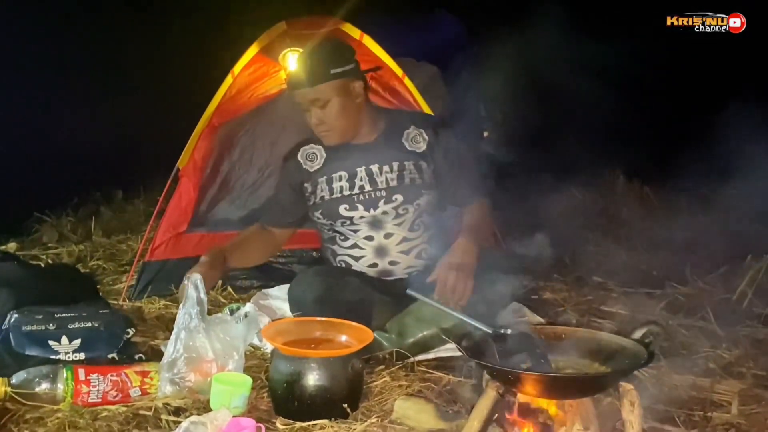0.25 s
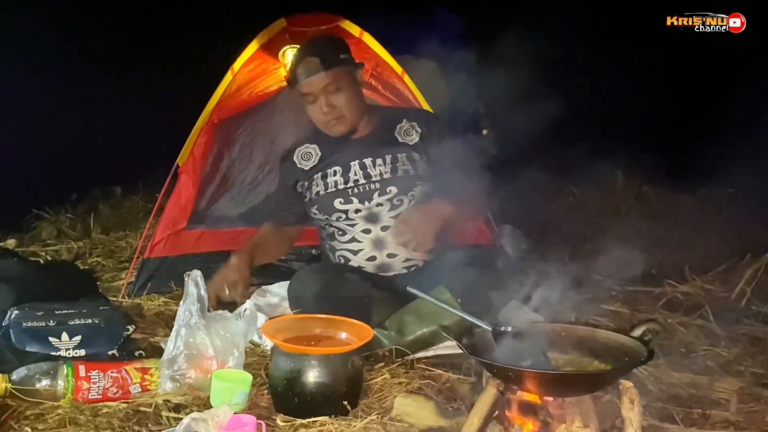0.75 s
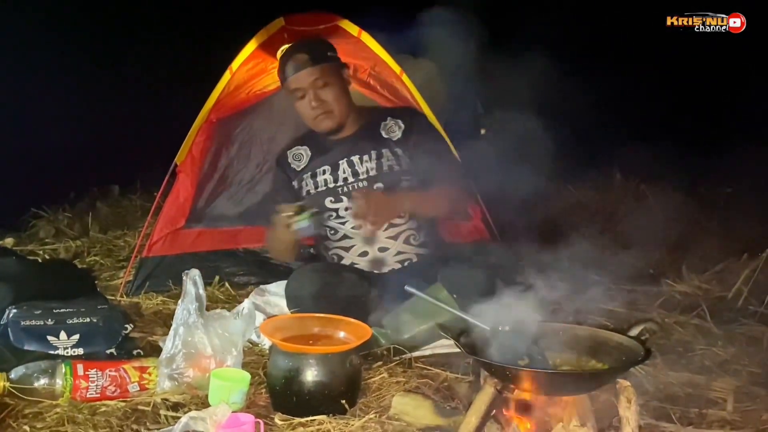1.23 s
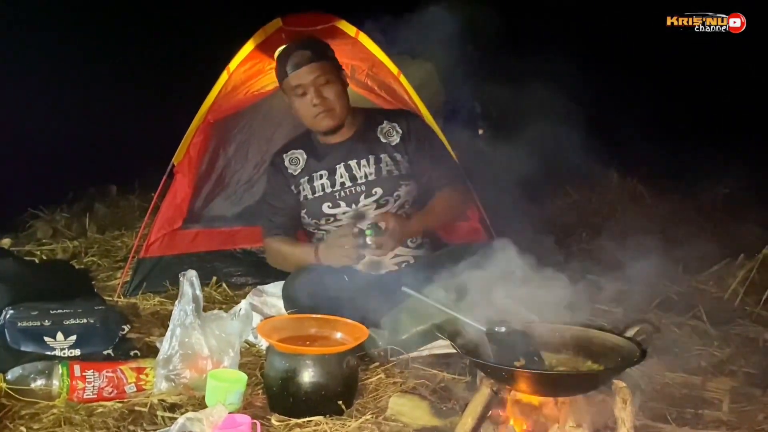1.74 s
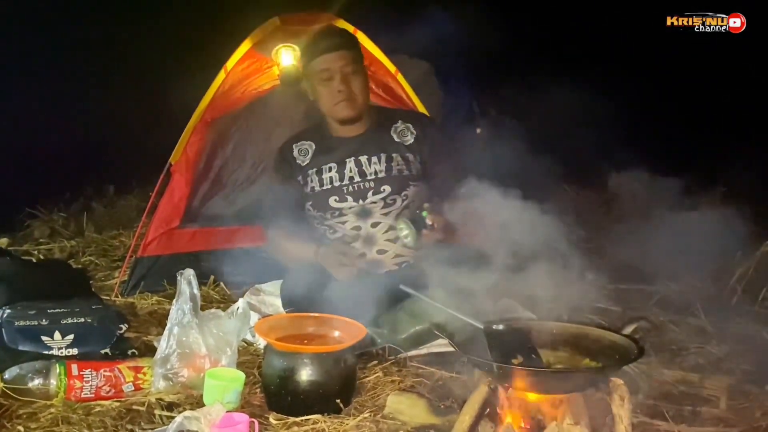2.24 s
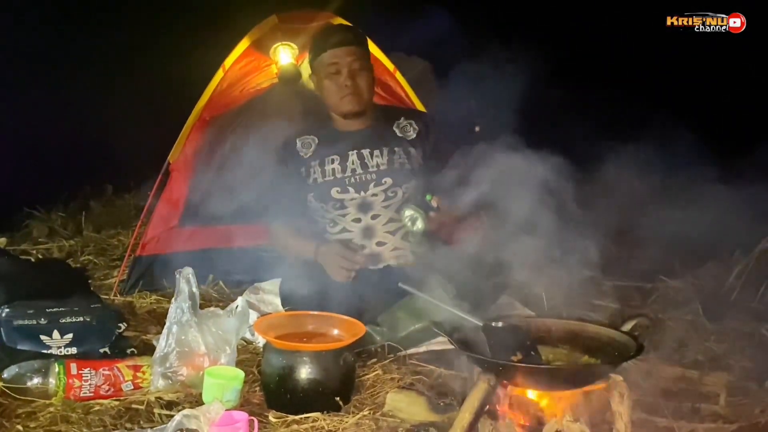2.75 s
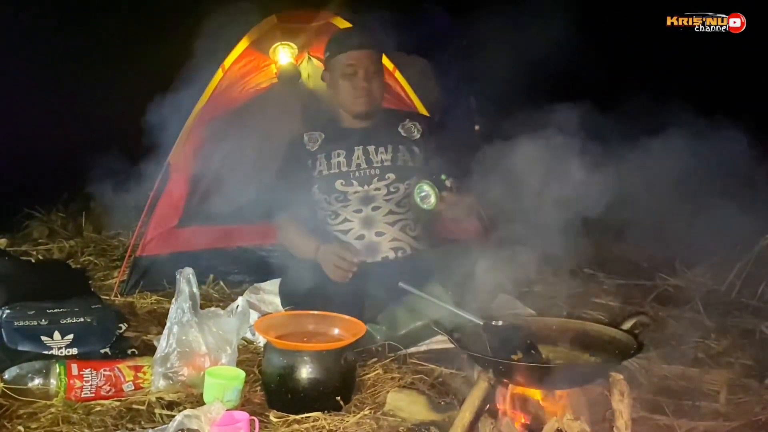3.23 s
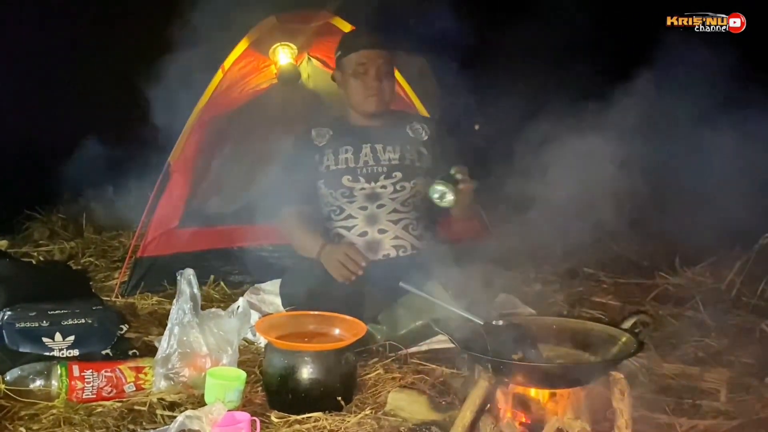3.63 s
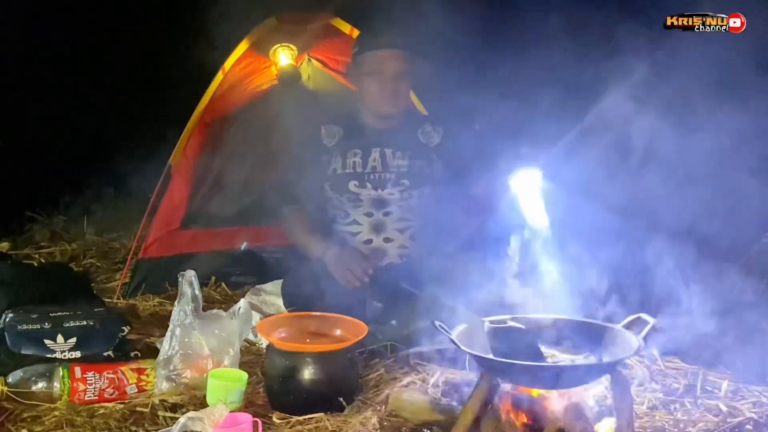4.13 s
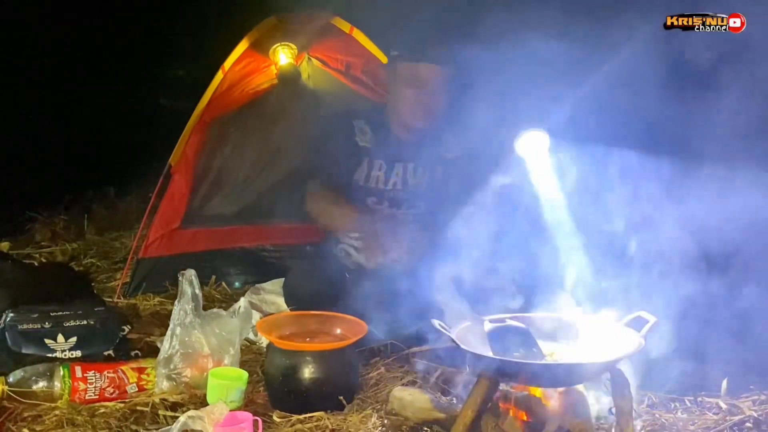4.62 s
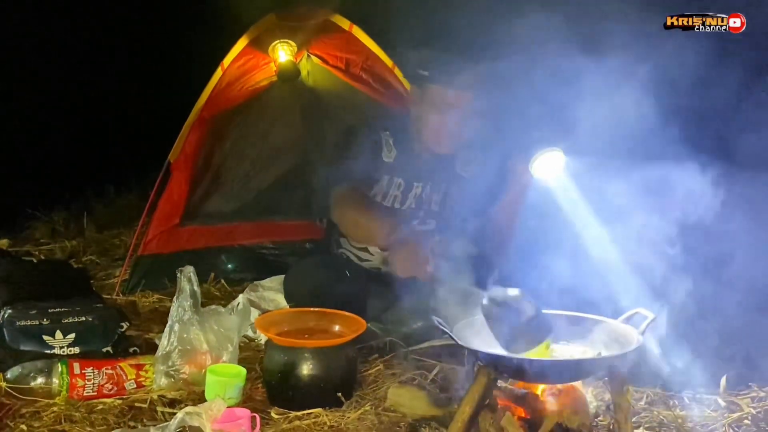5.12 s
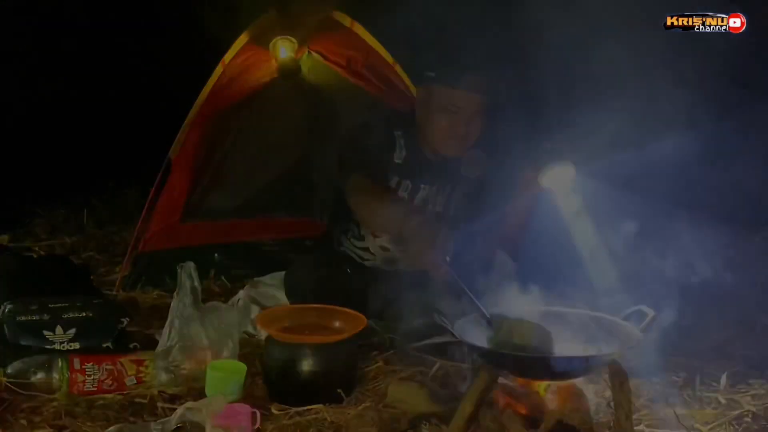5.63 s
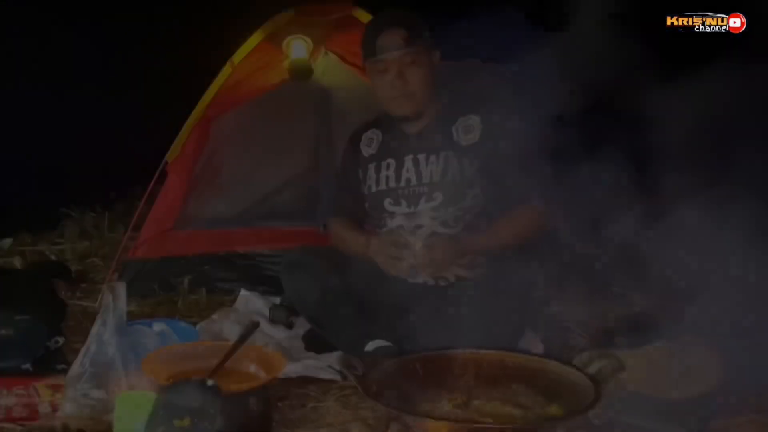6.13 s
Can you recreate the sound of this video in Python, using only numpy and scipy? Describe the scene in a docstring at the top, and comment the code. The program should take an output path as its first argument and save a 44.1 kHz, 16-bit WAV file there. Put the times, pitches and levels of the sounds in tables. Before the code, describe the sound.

A night field heard in stereo, close to a wood fire with no room echo. Throughout, mole crickets make an even buzz around 2.3 kHz, crickets trill in a shimmering band near 7 kHz, and a nearer one repeats chirping phrases about once a second. Beneath them flames flutter softly and a wok simmers with a fine, quiet sizzle. Small dull pops come irregularly, with a low thump near 1.6 s. At 2.4 s the wood bursts: a gritty, very loud crack and deep puff of air, a smaller spurt following at 2.65. Sharp snaps hit at 3.5, 3.9 and 4.2 s. At 5.07 a utensil lightly touches the wok and food rustles; at 5.5 it strikes loudly, ringing briefly and scraping for about 0.2 s, amid snaps and flame thumps. From 5.8 s low buzzing softens, another faint buzz joins, and high crickets brighten until about 6.4 s.

```python
"""Wood fire and wok at night

A wood fire burns under a simmering wok in a field: flames are fluttering low noise and short low thumps,
the crackle is short bursts of filtered noise, and once the wood bursts, with a big low puff of air.
A metal utensil touches the wok, then strikes and scrapes it, ringing a bank of fading tones.
All around, mole crickets buzz low and crickets trill and chirp high, each wing stroke a falling tone.
Near the end one more low buzz fades in, the other low ones get softer and the high ones louder."""
import sys
import numpy as np
from scipy import signal
from scipy.fft import rfft, irfft
from scipy.io import wavfile
from scipy.ndimage import uniform_filter1d

SR = 44100
rng = np.random.default_rng(int(sys.argv[2]) if len(sys.argv) > 2 else 0)


def wav_out(sig):
    """Save sig, one row per channel (or a flat mono array), as 16-bit PCM at SR to the path in sys.argv[1]."""
    wavfile.write(sys.argv[1], SR, np.round(np.clip(np.atleast_2d(sig).T, -1, 1) * 32767).astype(np.int16))


N = 280917
T = np.arange(N) / SR  # time of every sample in seconds
LEFT_LAG_S = .000272  # some sounds reach the left microphone this much later
# near the end the balance of the insect sounds shifts: start and length in seconds
SHIFT_S, SHIFT_RISE_S = 5.83, 0.26


def amp(db):
    """Turn decibels into a gain."""
    return 10 ** (np.asarray(db) / 20)


def level(x, db):
    """Scale a sound to an average (rms) level."""
    return x * amp(db) / np.sqrt(np.mean(x ** 2))


def peak(x, db):
    """Scale a sound so that its largest sample has this level."""
    return x * amp(db) / np.abs(x).max()


def fade(t, t60):
    """Exponential decay that falls 60 dB in t60 seconds."""
    return np.exp(-np.log(1000) * t / t60)


def ramp(start_s, rise_s):
    """Rise from 0 to 1 in a straight line, then hold."""
    return np.clip((T - start_s) / rise_s, 0, 1)


def walk(rate):
    """Slow random wandering with an rms of 1; rate is in new values per second."""
    k = int(SR / rate)
    steps = np.repeat(rng.standard_normal(N // k + 1), k)
    smooth = uniform_filter1d(uniform_filter1d(steps, k), k)
    return level(smooth[:N], 0)


def clicks(rate, spread_db):
    """Random clicks, mostly small and a few large; rate is per second."""
    happens = rng.random(N) < rate / SR
    size = amp(spread_db * np.minimum(rng.exponential(size=N), 4))
    return happens * rng.choice([-1, 1], N) * size


def colour(x, spectrum):
    """Filter a sound to a (Hz, dB) spectrum without any sound ahead of time, by way of its cepstrum."""
    size = 8192
    hz, db = np.transpose(spectrum)
    bins_hz = np.arange(size // 2 + 1) * SR / size
    curve_db = np.interp(np.log(bins_hz + 1), np.log(hz), db)
    cepstrum = irfft(np.log(amp(curve_db)))
    # folding the cepstrum onto its first half makes the filter react only after its input
    cepstrum[1:size // 2] *= 2
    cepstrum[size // 2 + 1:] = 0
    response = irfft(np.exp(rfft(cepstrum)))
    return np.apply_along_axis(signal.fftconvolve, -1, x, response)[..., :x.shape[-1]]


def resonate(x, hz, q):
    """Bring out one broad resonance."""
    hz = min(hz, SR / 3)
    return signal.lfilter(*signal.iirpeak(hz, max(q, .7), fs=SR), x)


def dull(x, hz):
    """Gently soften everything above a frequency."""
    return signal.sosfilt(signal.butter(2, min(hz, SR / 2.2), fs=SR, output="sos"), x)


def place(x, pan_db, lag_s=0):
    """Make mono stereo: pan_db is left minus right, and a positive lag delays the left side."""
    n = np.arange(len(x))
    left = np.interp(n - round(lag_s * SR), n, x, left=0)
    return np.array([left * amp(pan_db / 2), x * amp(-pan_db / 2)])


def scatter(x, wet_db, t60=0.038):
    """Grass and ground send each microphone its own short smear."""
    t = T[:SR // 5]
    tail = rng.standard_normal((2, len(t))) * fade(t, t60)
    tail /= np.sqrt(np.sum(tail ** 2, axis=1, keepdims=True))
    return x + amp(wet_db) * signal.fftconvolve(x, tail, axes=1)[:, :N]


def add(out, s, x):
    """Mix a sound in, starting at s seconds."""
    i = int(s * SR)
    out[..., i:i + x.shape[-1]] += x[..., :N - i]


def wash(spectrum, db, pan_db, flicker_db, shared_db):
    """Countless far insects merge into noise; only a part of it is alike at both microphones."""
    shared = place(amp(shared_db) * rng.standard_normal(N), 0, LEFT_LAG_S)
    crowd = rng.standard_normal((2, N)) + shared
    flicker = place(amp(flicker_db * walk(24.88)), pan_db)
    return level(colour(crowd, spectrum) * flicker, db)


def wings(rate_hz, tone_hz, fall_hz, slip, waver):
    """Each wing stroke is a swelling tone that falls in pitch; slip loosens its phase from stroke to stroke."""
    beats = rng.random() + np.cumsum(rate_hz * (1 + waver * walk(6))) / SR
    u = beats % 1  # how far through the stroke, from 0 to 1
    looseness = slip * rng.standard_normal(N)[beats.astype(int)]
    cycles = (tone_hz * u + fall_hz * u * (1 - u) / 2) / rate_hz + looseness
    return level(np.sin(np.pi * u) * np.sin(2 * np.pi * cycles), 0)


def mole_crickets():
    """Wing strokes fast enough to fuse into buzzes: two even, some looser, and one heard only near the end."""
    # The merged far low insects. Each row: frequency in Hz, relative level in dB.
    low_wash = [(1400, -39), (1780, -17), (1900, -10), (2030, -7), (2240, -7), (2440, 2.5), (2520, -13),
                (2680, -38), (2900, -28), (3600, -40.5)]
    even = place(wings(rate_hz=136.2, tone_hz=2328.3, fall_hz=480, slip=0.12, waver=0.003034), 6.1)
    lower = place(wings(rate_hz=136.2, tone_hz=1917, fall_hz=148, slip=0.066, waver=0.00195), 2.7)
    loose = 0
    for hz in np.linspace(110, 140, 3):
        neighbour = wings(hz, tone_hz=2287.6, fall_hz=307, slip=0.27, waver=.03)
        loose = loose + scatter(place(neighbour, 4.3), -1.7)
    another = place(wings(rate_hz=122.3, tone_hz=2304, fall_hz=238, slip=0.1, waver=0.00285), 5) * amp(-29.5)
    chorus = level(even, -34.0) + level(lower, -51.0) + level(loose, -38)
    chorus = chorus + wash(low_wash, -36.5, 3.2, 0.7, -12)
    shift = ramp(SHIFT_S, SHIFT_RISE_S)
    return chorus * amp(-4 * shift) + another * shift


def trillers():
    """High crickets whose fast strokes swell several times a second, over thin far trills."""
    # The merged far high insects. Each row: frequency in Hz, relative level in dB.
    high_wash = [(3600, -36.5), (4400, -24), (4750, -12.5), (5100, -5.5), (5400, -4.5), (5800, -8),
                 (6150, -17.5), (6500, -5.5), (6880, 0.5), (7300, -2.5), (7750, -16), (8350, -7.5),
                 (9000, -54), (9700, -24.5)]
    # Thin steady trills far away. Each row: frequency in Hz, middle gain in dB.
    thin_trills = [(5113, -45.5), (5350, -50), (5453, -50)]
    near = 0
    for hz, db in [(83.0, -2.5), (88.8, 2.5), (45.24, -1.5)]:  # (strokes per s, relative dB)
        swells = 6.5 * T + rng.random() + 0.48 * walk(1.86)
        throb = amp(db + 4.4 * np.sin(2 * np.pi * swells))
        trill = wings(hz, tone_hz=6885, fall_hz=563, slip=0.46, waver=.008) * throb
        near = near + scatter(place(trill, 0.42), -12)
    thin = np.zeros((2, N))
    for hz, db in thin_trills:
        for side in range(2):  # each microphone gets its own wandering
            strength = amp(db + 2 * walk(11))
            thin[side] += strength * np.sin(2 * np.pi * (hz * T + 0.13 * walk(10)))
    chorus = level(near, -33.5) + wash(high_wash, -31.0, 0.86, 1, 0)
    return chorus * amp(1.6 * ramp(SHIFT_S, SHIFT_RISE_S)) + thin


def near_strokes(step_s=.056, double_gap_s=.035):
    """Middle times of the near cricket's strokes: each phrase is an even run, then double strokes."""
    # Each row: start in seconds, number of even strokes, number of double strokes, seconds between doubles.
    phrases = [(.075, 0, 2, .111), (.305, 5, 5, .114), (1.212, 5, 5, .111), (2.06, 4, 6, .113),
               (3.0, 6, 6, .122), (4.06, 4, 6, .117), (4.995, 4, 10, .1175)]
    times = []
    for s, even, doubles, period in phrases:
        run = s + step_s * np.arange(even)
        firsts = s + step_s * even + period * np.arange(doubles)
        times += [*run, *firsts, *(firsts + double_gap_s)]
    return times


def chirpers(length_s=.037, tone_hz=5720, fall_hz=580):
    """A near cricket draws slow, rasping, falling strokes; others sing a little lower and grow louder."""
    t = T[:int(length_s * SR)]
    u, near = t / length_s, np.zeros(N)
    for s in near_strokes():
        pitch, size_db = rng.standard_normal(2)
        hz = tone_hz * (1 + .005 * pitch) + fall_hz * (.5 - u)
        stroke = np.sin(np.pi * u) * np.sin(2 * np.pi * np.cumsum(hz) / SR)
        add(near, s - length_s / 2, amp(size_db) * stroke)
    rasp = amp(2 * walk(300))
    near = level(scatter(place(near * rasp, 0), -8), -44.5)
    others = 0
    for hz in np.linspace(35, 70, 4):
        singer = wings(hz, tone_hz=5336, fall_hz=480, slip=0.58, waver=0.016)
        others = others + scatter(place(singer, 1, LEFT_LAG_S), 12.0)
    gain_db = 1.56 * T + 8 * ramp(SHIFT_S, SHIFT_RISE_S)  # a slow rise, then a quick one near the end
    return near + level(others, -51.5) * amp(gain_db)


def simmering_wok():
    """The food simmers in small soft bursts of noise under a fine steady sizzle."""
    # The two spectra. Each row: frequency in Hz, relative level in dB.
    simmer_colour = [(200, -6), (380, -3), (600, -12), (800, -18), (1130, -3.5), (1400, -10.5),
                     (1800, -6.5), (3000, -10.5)]
    sizzle_colour = [(300, 8), (1200, 10.5), (3000, 15), (4200, 9), (8000, 1), (11500, 7.5), (15500, -29)]
    bursts = signal.fftconvolve(np.abs(clicks(60, 3.5)), fade(T[:SR // 10], 0.11))[:N]
    soft_bursts = uniform_filter1d(bursts, size=200)
    simmer = dull(colour(soft_bursts * rng.standard_normal(N), simmer_colour), 3070)
    spatter = level(clicks(1500, 1.8), -7.5)
    sizzle = colour(rng.standard_normal(N) + spatter, sizzle_colour) * amp(0.47 * walk(3.6))
    simmer = scatter(place(simmer, -.5), -7)
    sizzle = scatter(place(sizzle, .5, LEFT_LAG_S), -8)
    return level(simmer, -45.5) + level(sizzle, -46.0)


def pressure(attack_s=0.0017, start_s=5.494, hold_s=0.17, release_t60=.09):
    """Force of the utensil on the wok: it bites in, slides on and lifts off."""
    slide_db, bite_db, bite_s = -26, 8.5, 0.012
    bite = np.exp(-np.maximum(T - start_s, 0) / bite_s)
    release = fade(np.maximum(T - start_s - hold_s, 0), release_t60)
    return ramp(start_s, attack_s) * release * amp(slide_db + bite_db * bite)


def utensil(wander_db=5, ring_db=9, grit_db=3):
    """Blows and stick-slip scraping ring the same tones of the metal; the rough contact adds grit."""
    # Ringing tones of wok and utensil. Each row: pitch in Hz, relative level in dB, 60 dB decay in seconds.
    wok_tones = [(657, -14, .1), (980, -16, .15), (1091, -13, .45), (1505, 1, .22), (1627, -1, .13),
                 (1665, -1, .1), (1791, 3, .2), (1880, -7, .08), (2260, -7, .07), (2400, -7, .07),
                 (2509, -7, .15), (2627, -9, .09), (2762, -7, .2), (3248, -5, .2), (3512, 0, .16),
                 (3561, 1, .14), (3590, 1, .1), (3762, -2, .15), (4005, -4, .18), (4377, -6, .07),
                 (4624, -3, .07), (4782, -4, .09), (4853, -4, .09), (4920, -4, .08)]
    # Blows. Each row: start in seconds, peak in dB, top edge in Hz (lower for a softer touch).
    blows = [(5.073, -39, 705), (5.4936, -2.5, 9000), (5.499, -25, 4000)]
    # Spectrum of the rough contact. Each row: frequency in Hz, relative level in dB.
    grit_colour = [(200, 3), (450, -10), (650, -14), (820, -33), (1300, -16), (1600, 14.5), (1950, -8),
                   (2450, 5), (3000, 0), (3600, 2.5), (4200, 4.5), (4850, 1.5), (5600, -4.5), (8000, -16),
                   (11000, -3), (16000, -26)]
    t = T[:SR // 2]
    slips = level(clicks(1500, 2.7), 0) * pressure() * amp(2 * walk(90))
    out = scatter(place(colour(slips, grit_colour), 1.3), 0, t60=0.035) * amp(grit_db)
    ring = 0
    for hz, db, t60 in wok_tones:
        phase = hz / 9000 * rng.standard_normal((2, 1))  # differs between the microphones
        mode = amp(db) * fade(t, t60) * np.sin(2 * np.pi * hz * t + phase)
        # the sliding contact damps each tone and grips it more or less
        held = mode * fade(t, .5)
        grip = slips * amp(ring_db + wander_db * walk(30))
        out += signal.oaconvolve(grip[None], held, axes=1)[:, :N] / np.sqrt(len(t))
        ring = ring + mode
    for s, db, top_hz in blows:
        contact = colour(rng.standard_normal(len(t)) * fade(t, 0.05), grit_colour)
        blow = peak(ring, 0) + peak(contact, -9)
        add(out, s, peak(dull(blow, top_hz), db))
    return out


def thump(db, first_hz, length_s, crest, end_hz=43.6, bend=0.69, rumble_db=-7.0, sharpness=1.55):
    """A short low thump: a swelling tone whose heard pitch bends downward, plus low noise mostly early on."""
    u = T[:int(length_s * SR)] / length_s
    # crest is the share of the length at which the thump is loudest
    swell = np.sin(np.pi * np.interp(u, [0, min(crest, .9), 1], [0, .5, 1]))
    hz = first_hz * (end_hz / first_hz) ** u ** bend  # bend under 1: the pitch falls early
    tone = np.sin(2 * np.pi * np.cumsum(hz) / SR)
    rumble = level(dull(rng.standard_normal(len(u)), 1.05 * first_hz), rumble_db) * (1 - u)
    return peak(swell ** sharpness * tone + swell * rumble, db)


def flames(step_s=0.00078):
    """Turbulent flames flutter low, with low thumps and one big puff of air out of step left and right."""
    # Body of the flames, joined by straight lines. Each row: time in seconds, gain in dB.
    flame_gains = [(0.0, -48), (0.44, -41), (0.65, -43.5), (3.55, -37.5), (4.13, -42.5), (5.55, -33),
                   (6.37, -44.5)]
    # Spectrum of the flutter. Each row: frequency in Hz, relative level in dB.
    flame_colour = [(20, -43), (32, -39), (50, -4), (75, -2), (107, 2), (150, -1), (230, -13.5),
                    (400, -28.5), (600, -34.5), (1100, -34), (2000, -66)]
    # Low flame puffs, heard as thumps.
    # Each row: start in seconds, peak in dB before panning, starting pitch in Hz.
    flame_puffs = [(1.559, -16.5, 358), (1.769, -23.5, 192), (4.551, -23, 260), (5.221, -20, 221),
                   (5.453, -26, 180), (5.553, -30, 218), (5.69, -22.5, 161), (5.867, -22.5, 168)]
    flutter = colour(rng.standard_normal(N) * amp(3.24 * walk(21.97)), flame_colour)
    body = level(flutter, 3.3) * amp(np.interp(T, *np.transpose(flame_gains)))
    out = scatter(place(body, 0.95), -10)
    for s, db, hz in flame_puffs:
        add(out, s, place(thump(db, hz, length_s=.046, crest=0.29), 1.0, -step_s))
    # a big low puff of air buffets the microphones: longer, and loudest late
    buffet = thump(-2.5, 402, length_s=0.0525, crest=0.61)
    add(out, 2.423, place(buffet, 2.3, -step_s))
    return out


def faint_pops(per_s=3.5, middle_db=-35, spread_db=2, middle_hz=1150, spread_octaves=.3, pan_db=1.0):
    """Small pops at random times, as rows of seconds, peak dB, pitch in Hz and left minus right dB."""
    count = int(per_s * N / SR)
    chance = rng.standard_normal((count, 3))
    rows = []
    for s, (size, pitch, side) in zip(rng.random(count) * N / SR, chance):
        hz = middle_hz * 2 ** (spread_octaves * pitch)
        rows.append((s, middle_db + spread_db * size, hz, pan_db * side))
    return rows


def crackle(pop_t60=0.058, pop_q=3.2, overtone=1.76, overtone_db=-6):
    """Filtered noise bursts: dull ringing pops, dry snaps and longer gritty spurts, a few from the wok."""
    # All peaks are before the final smear, those of the pops before panning too.
    # Louder dull pops; the one at 5.072 belongs to the utensil touching the wok.
    # Each row: start in seconds, peak in dB, pitch in Hz, left minus right in dB.
    loud_pops = [(0.101, -21.5, 950, -2), (0.372, -28.5, 1160, -1), (0.704, -29, 1090, -1),
                 (0.866, -28, 1180, -5), (1.042, -28, 724, -3), (1.178, -31, 1710, 0),
                 (1.317, -25, 1050, -2.5), (2.019, -25, 1180, 3), (2.275, -25.5, 880, 4),
                 (2.654, -24.5, 340, 12), (2.906, -25, 1070, 3), (3.386, -28, 380, 10),
                 (3.83, -31, 1140, -4), (3.906, -27, 383, 4), (4.029, -32, 315, 5), (4.848, -23, 1010, -3),
                 (5.072, -27.5, 1140, -3), (5.224, -26, 300, -1.5), (5.266, -30, 930, -3),
                 (5.892, -26, 283, 0), (6.019, -20, 1220, 1)]
    # Sharp snaps; the one at 5.072 belongs to the utensil touching the wok.
    # Each row: start in seconds, peak in dB, brightest Hz, 60 dB decay in seconds.
    snaps = [(1.06, -18, 11000, .008), (2.4188, -0.5, 8950, 0.041), (2.655, -15, 3960, 0.014),
             (3.49, -16.5, 10000, .008), (3.8846, -5.5, 9500, 0.01), (4.161, -10.5, 5400, 0.017),
             (5.072, -16, 10000, 0.013), (5.492, -6, 11000, 0.017), (5.569, -5.5, 7500, 0.0088),
             (6.0, -24, 10000, .008), (6.297, -19, 11000, 0.012)]
    # Gritty spurts from the fire, and at 5.099 the rustle of food sliding in the wok.
    # Each row: start in seconds, peak in dB, rise in seconds, 60 dB decay in seconds, top edge in Hz.
    spurts = [(2.378, -10, 0.0048, 0.36, 3500), (2.417, 1.5, 0.0041, 0.063, 11900),
              (2.428, -13.5, 0.003, 0.16, 14100), (2.645, -14, 0.0087, 0.14, 4500),
              (5.069, -32, 0.02, 0.29, 5000), (5.099, -17, 0.06, 0.26, 12100)]
    # Spectrum of the spurts. Each row: frequency in Hz, relative level in dB.
    spurt_colour = [(150, 6.5), (400, 11), (1000, -10), (2100, 4.5), (3000, -1), (4400, 5.5), (5600, 2),
                    (7500, -18.5), (11000, 5.5), (16000, -23.5)]
    out, t = np.zeros((2, N)), T[:SR // 4]
    for s, db, hz, pan_db in [*loud_pops, *faint_pops()]:
        push = rng.standard_normal(len(t)) * fade(t, pop_t60)
        pop = resonate(push, hz, pop_q) + amp(overtone_db) * resonate(push, overtone * hz, pop_q)
        pop = dull(resonate(pop, hz, 0.66), 2100)
        add(out, s, place(peak(pop, db), pan_db))
    for s, db, hz, t60 in snaps:
        snap = resonate(rng.standard_normal(len(t)) * fade(t, t60), hz, 1.0)
        add(out, s, place(peak(snap, db), 0, LEFT_LAG_S))
    for s, db, rise, t60, top_hz in spurts:
        grit = rng.standard_normal((2, len(t))) * np.minimum(t / rise, fade(t - rise, t60))
        grit *= amp(1.9 * walk(500)[:len(t)])  # the level sputters
        spurt = dull(colour(grit, spurt_colour), top_hz) * place(np.ones(len(t)), 3.2)
        add(out, s, peak(spurt, db))
    return scatter(out, -18)


def scene():
    """Insects all around, fire and wok in front."""
    insects = mole_crickets() + trillers() + chirpers()
    return insects + simmering_wok() + utensil() + flames() + crackle()


def record(dry):
    """The recorder drops the deepest bass, clips at full scale and cuts the top."""
    lean = signal.sosfilt(signal.butter(4, 35, "highpass", fs=SR, output="sos"), dry)
    clipped = np.clip(lean, -1, 1)
    return signal.sosfilt(signal.ellip(8, .2, 70, 15900, fs=SR, output="sos"), clipped)


dry = scene()
out = record(dry)
wav_out(out)
```